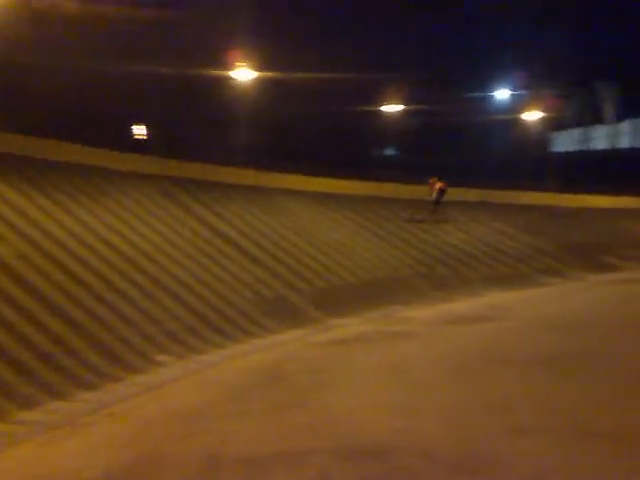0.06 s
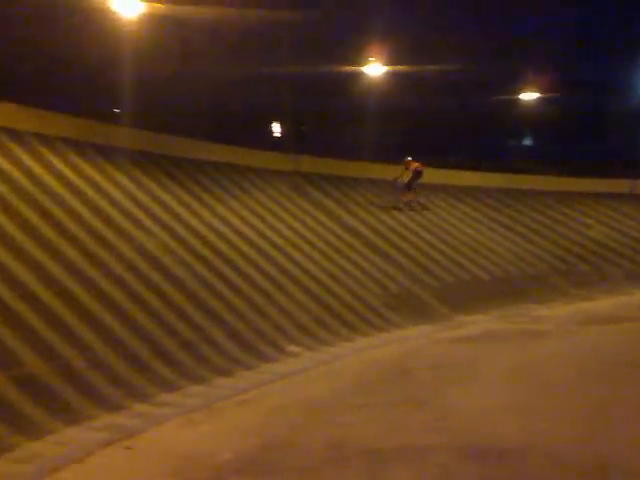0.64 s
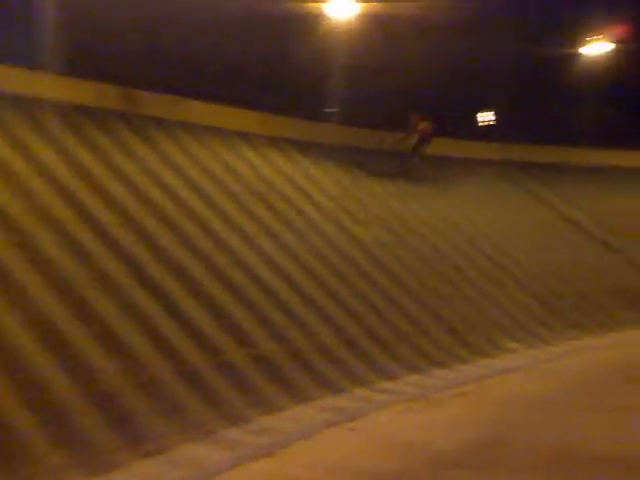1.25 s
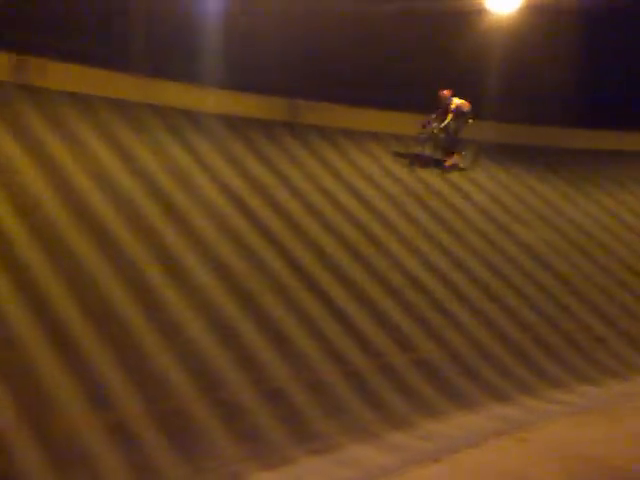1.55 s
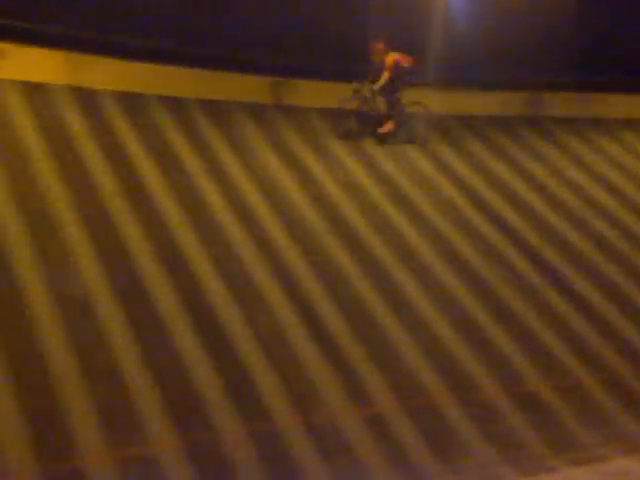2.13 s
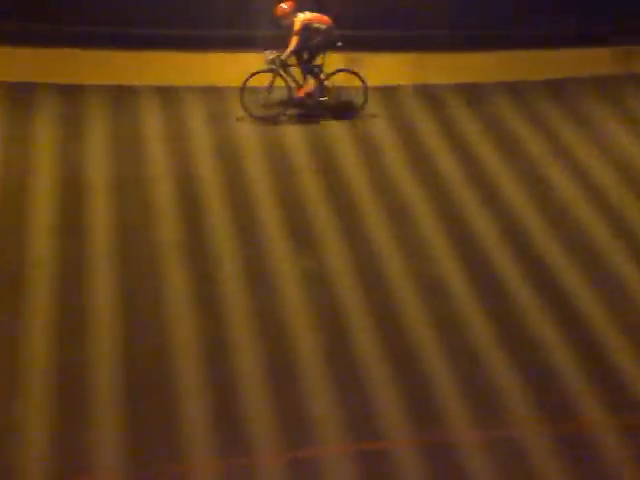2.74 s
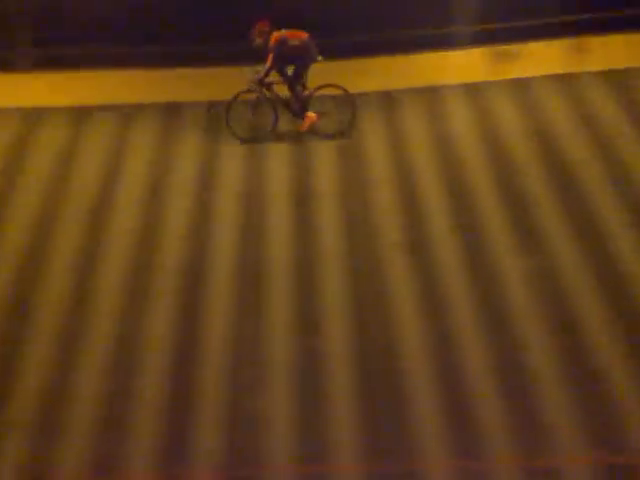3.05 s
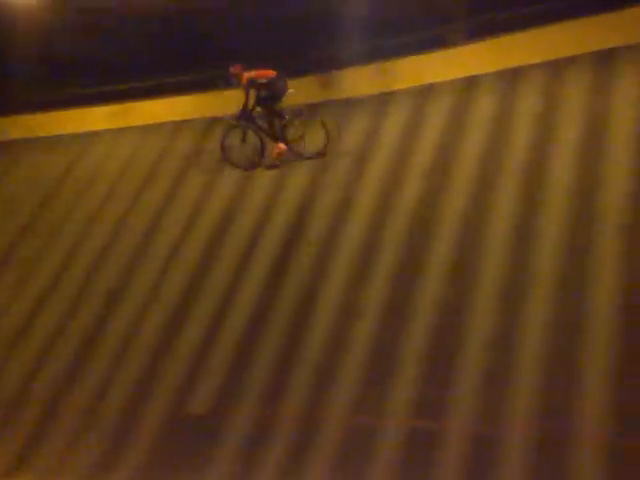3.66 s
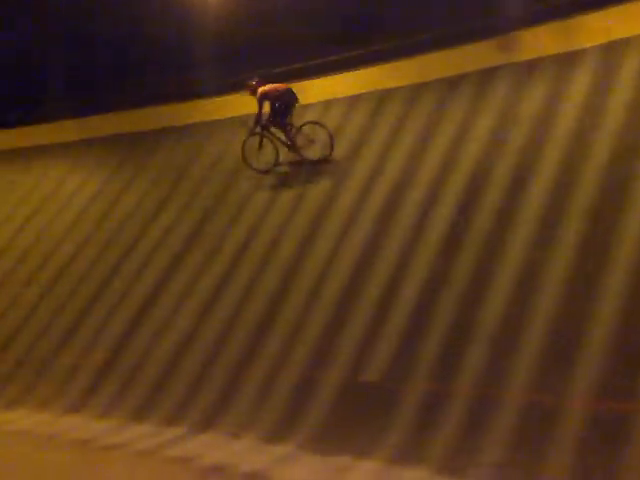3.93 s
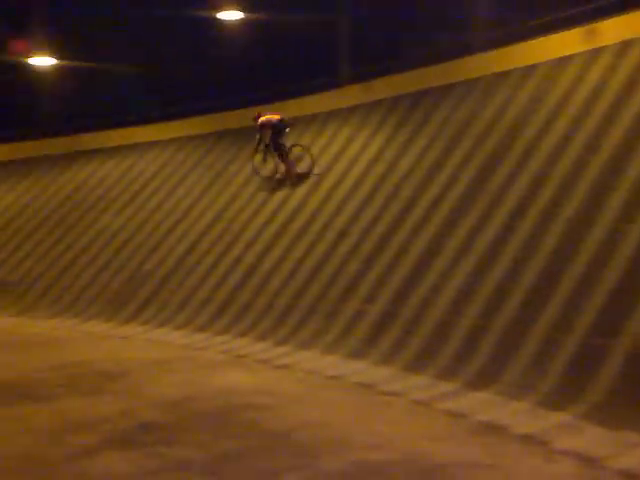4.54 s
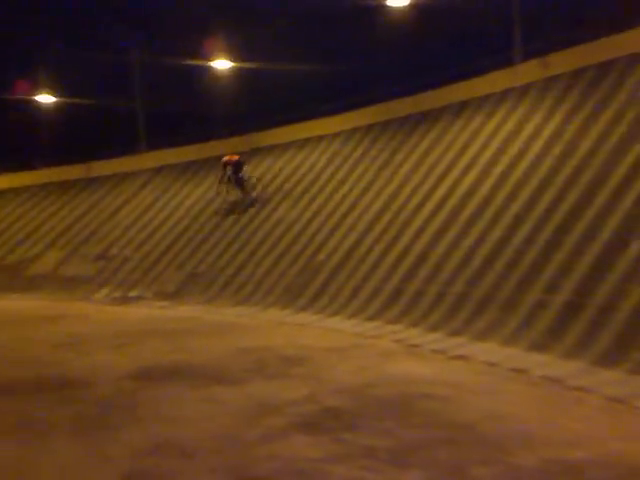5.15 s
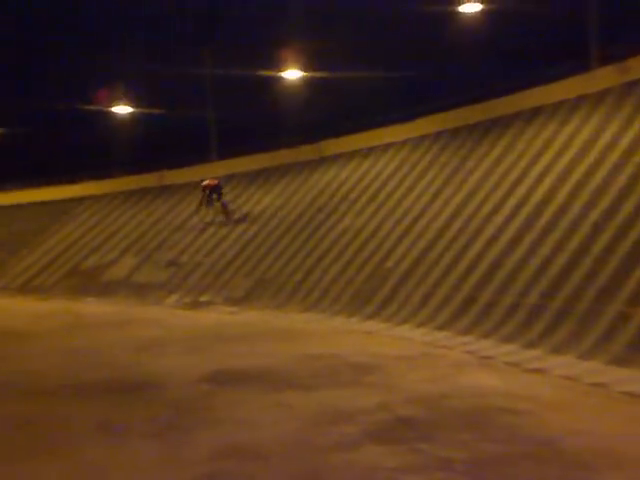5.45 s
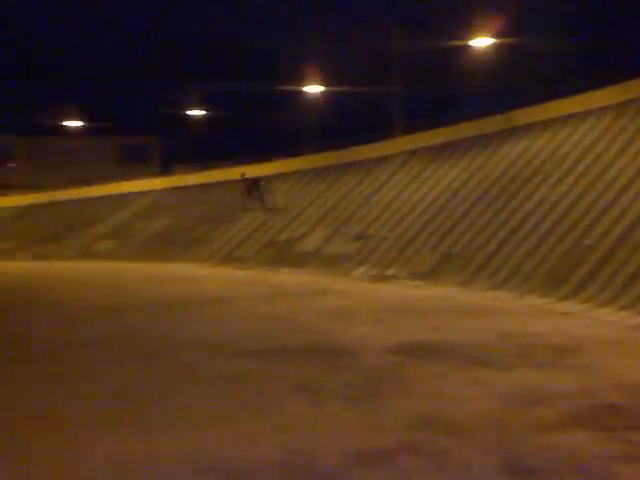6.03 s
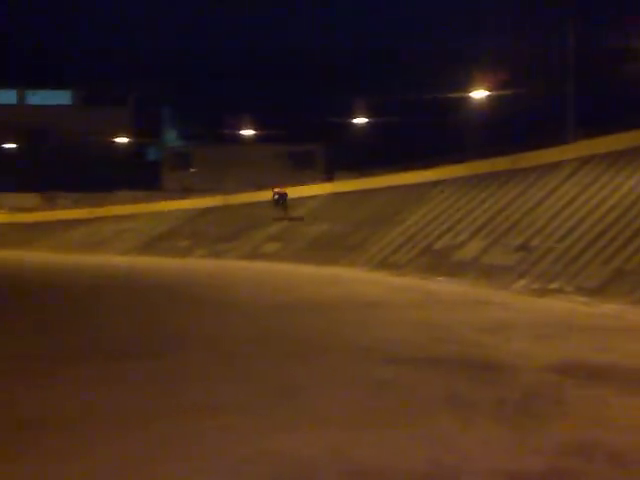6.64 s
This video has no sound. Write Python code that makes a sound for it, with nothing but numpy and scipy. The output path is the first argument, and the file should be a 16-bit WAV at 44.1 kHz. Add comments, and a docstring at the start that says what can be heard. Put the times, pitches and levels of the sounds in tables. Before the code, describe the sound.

Heard from the middle of an open concrete cycle track, distant bicycle tyres hiss softly and tick over grit, shifting in tone as the rider goes by. A low, faint rumble of night air lies underneath. Late on, something strikes the camera case right at the microphone with a loud, sharp knock. A few soft handling bumps follow while the tyre noise fades.

```python
"""Bicycle tyres hiss and crackle over grit and rough stretches, lapping a banked concrete track at night.
Narrow bands stand out in the hiss; a reflection off the banking shifts its colour as the bicycle passes.
Late on, something knocks sharply on the case of a hand-held camera in the infield, among softer
handling bumps. The night air rumbles underneath."""
import sys
import numpy as np
from scipy import signal
from scipy.fft import rfft, irfft
from scipy.io import wavfile
from scipy.ndimage import uniform_filter1d

SR = 44100
rng = np.random.default_rng(int(sys.argv[2]) if len(sys.argv) > 2 else 0)


def put_to_file(sound):
    """Save the sound as 16-bit audio at rate SR, in the file named by the first command-line argument."""
    columns = np.atleast_2d(sound).T  # one column per channel
    safe = np.clip(columns, -1, 1)
    whole_steps = np.round(safe * 32767)
    wavfile.write(sys.argv[1], SR, whole_steps.astype(np.int16))


N = 299439
TIME_S = np.arange(N) / SR
FRAMES = dict(fs=SR, nperseg=1024, noverlap=768)

# blows on the case: (time [s], relative force [dB], contact cutoff [Hz])
BLOWS = [ (6.0123, -2, 7000), (6.0133, 0, 2100), (6.0144, 8, 1150), (6.0771, -33.5, 7400),
         (6.1874, -1.5, 493)]


def tyres(grit_db=-3):
    """Hiss and grit swell and fade together; more grit where the hiss is bright."""
    level_db, treble_db = surface(TIME_S)
    return gain_of(level_db) * (hiss() + gain_of(grit_db + treble_db) * grit())


def surface(t, edge_s=0.041):
    """Level and treble of the tyre noise [dB]: a slow course, offset on each rough stretch."""
    # ordinary concrete: (time [s], relative level [dB], treble re mid band [dB])
    lap = [(0, -55.5, -9.5), (0.3, -56.5, -9.5), (0.9, -53, -6.5), (1.8, -52.5, -8.5), (2.2, -51.5, -8.5),
           (2.65, -49.5, -11.5), (3.2, -50.5, -14), (4.3, -51.5, -11.5), (5.3, -52.5, -11),
           (5.75, -52, -15.5), (6.22, -52.5, -13.5), (6.44, -63, -10), (6.79, -63, -9.5)]
    # rough stretches: (start [s], length [s], level change [dB], treble change [dB])
    stretches = [(0.313, 0.2, 4, -4.5), (0.62, 0.15, 4.5, 0.5), (1.065, 0.19, 5, -3.5),
                 (1.292, 0.085, 2, 1.5), (2.063, 0.15, 1.5, -1), (2.443, 0.11, 6, -5),
                 (3.24, 0.3, 2.5, 0.5), (3.86, 0.24, 2.5, 1.5), (5.315, 0.047, 4.5, 1),
                 (5.912, 0.27, 1.5, 5)]
    level_db, treble_db = follow(lap, t)
    for start_s, length_s, louder_db, brighter_db in stretches:
        on = np.clip(0.5 + np.minimum(t - start_s, start_s + length_s - t) / edge_s, 0, 1)
        level_db += on * louder_db
        treble_db += on * brighter_db
    return level_db, treble_db


def hiss(flutter_db=2.5, flutter_hz=50, patch_db=2.2):
    """Rubber on rough concrete: fluttering noise whose colour changes from patch to patch."""
    # tyre spectrum: (frequency [Hz], relative density [dB])
    spectrum = [(130, -57), (200, -14), (300, -6.5), (450, -13.5), (680, -4.5), (1200, -0.5), (1900, 0),
                (2400, -4), (2900, -9), (4000, -14.5), (5000, -20.5), (6500, -35), (9000, -44.5),
                (14000, -65.5)]
    contact = rng.standard_normal(N) * gain_of(flutter_db * drift(flutter_hz))
    hz, t, z = signal.stft(contact, **FRAMES)
    patches = uniform_filter1d(rng.standard_normal(z.shape), size=5, axis=0)
    patches = evened(uniform_filter1d(patches, size=12, axis=1))
    z *= gain_of(spectrum_at(spectrum, hz)[:, None] + patch_db * patches)
    # the surface sets the treble-to-mid ratio
    power = (abs(z) ** 2).mean(1)
    mid = power[(hz > 600) & (hz < 2600)].sum()
    treble = power[(hz > 3000) & (hz < 6500)].sum()
    tilt_db = surface(t)[1] - 10 * np.log10(treble / mid)
    shelf = spectrum_at([(2000, 0), (3400, 1)], hz)[:, None]
    return evened(signal.istft(z * gain_of(shelf * tilt_db), **FRAMES)[1][:N])


def grit(grains_per_s=85, t60_s=0.018):
    """Small grains snap under the tyres, each a brief crackle."""
    # snap spectrum: (frequency [Hz], relative density [dB])
    spectrum = [(200, -26), (800, -11.5), (2000, -2.5), (3400, 6.5), (5000, -5), (7000, -17),
                (10000, -40), (16000, -45.5)]
    size = gain_of(3.5 * np.minimum(rng.exponential(1, N), 3))
    struck = rng.random(N) < grains_per_s / SR
    envelope = signal.lfilter([1], [1, -gain_of(-60 / (t60_s * SR))], size * struck)
    return evened(colour(envelope * rng.standard_normal(N), spectrum))


def scuffs():
    """The tyres tick and scuff on grit in broad bands."""
    # scuffs: (time [s], relative level [dB], centre [Hz], t60 [s])
    ticks = [(0.022, -45, 1680, 0.07), (0.129, -47.5, 1900, .05), (0.651, -46.5, 784, 0.065),
             (0.700, -46.5, 780, 0.055), (0.758, -41.5, 2500, 0.08), (1.017, -38.5, 3660, 0.014),
             (1.197, -41.5, 706, 0.056), (1.345, -49, 2920, .08), (2.105, -40.5, 2260, 0.057),
             (2.222, -40.5, 2150, 0.024), (2.367, -34.5, 1680, 0.023), (2.448, -37, 1650, 0.033),
             (2.501, -39, 1140, .05), (2.745, -40, 2110, 0.054), (3.158, -42, 1000, 0.035),
             (3.219, -46, 3580, 0.031), (3.429, -42, 2280, 0.027), (3.782, -40, 945, 0.042),
             (4.083, -45, 1900, .03), (4.513, -41, 2200, 0.18), (4.978, -42, 1860, 0.024),
             (5.076, -39.5, 1700, 0.15), (5.457, -37.5, 1660, 0.046), (5.495, -39.5, 2300, .045),
             (5.619, -43, 2070, .034), (6.140, -45.5, 3370, 0.099), (6.299, -47.5, 1940, 0.13)]
    return bursts(ticks, rise_s=0.00073, half_width_oct=0.54)


def hiss_peak(x, width_hz=175, peak_db=4):
    """A narrow band near 2 kHz stands out in the tyre hiss, dipping in pitch as the bicycle passes."""
    # peak course: (time [s], centre [Hz])
    course = [(0, 1900), (1.1, 1950), (1.7, 1790), (4.3, 1790), (5.2, 2064), (6.79, 2050)]
    hz, t, z = signal.stft(x, **FRAMES)
    boost_db = peak_db * bell(hz[:, None], follow(course, t)[0], width_hz)
    return signal.istft(z * gain_of(boost_db), **FRAMES)[1][:N]


def pings():
    """Brief narrow pings and longer whistling bands in the tyre noise."""
    # pings and whistles: (time [s], relative level [dB], centre [Hz], t60 [s])
    bands = [(0.335, -47.5, 1390, 0.3), (0.68, -51.5, 3400, 0.46), (1.017, -36.5, 4100, 0.019),
             (1.098, -45, 1400, 0.083), (3.27, -52, 1250, 0.47), (3.385, -41.5, 1210, 0.084),
             (3.46, -46.5, 1820, 0.36), (3.91, -62, 4770, 0.87), (4.52, -44, 2300, 0.2),
             (6.49, -61.5, 2670, 1)]
    return bursts(bands, rise_s=0.0014, half_width_oct=0.075)


def banking(hz, t, pass_s=3, half_width_s=1.94):
    """Comb response of the banking: as the bicycle nears, the reflection lags more and weakens."""
    nearness = np.exp(-((t - pass_s) / half_width_s) ** 4)
    spacing_hz = np.interp(nearness, [0, 1], [681, 584])
    reflection = np.interp(nearness, [0, 1], [0.24, 0.12])
    return 1 / (1 - reflection * np.exp(-2j * np.pi * hz[:, None] / spacing_hz))


def track_to_microphone(x):
    """Sound arrives directly and off the banking, then passes the microphone's port."""
    # port resonances: (centre [Hz], width [Hz], gain [dB])
    port = [(1150, 143, 1.5), (1410, 290, -1), (1810, 300, 1), (2250, 170, 2), (3630, 190, 2.5),
            (4320, 370, -1.5), (4770, 347, 4.5), (6250, 300, 3)]
    hz, t, z = signal.stft(x, **FRAMES)
    port_db = sum(db * bell(hz, centre_hz, width_hz) for centre_hz, width_hz, db in port)
    return signal.istft(z * banking(hz, t) * gain_of(port_db)[:, None], **FRAMES)[1][:N]


def knocks():
    """Blows ring the case; soft contacts reach only low modes; the small shell radiates no deep bass."""
    # case modes: (frequency [Hz], relative level [dB], t60 [s])
    modes = [ (278, -21.5, .031), (510, -29, .02), (882, -11.5, .019), (1342, -15.5, .014),
             (1700, -40, 0.0121), (2060, -11.5, 0.026), (2990, -21, 0.011), (3410, -1, 0.0062),
             (4210, -16.5, 0.019), (5320, -5, 0.0048), (7000, -22.5, 0.014), (8950, -26.5, 0.0085),
             (11550, -27, .006), (14300, -40.5, 0.0046)]
    out, t = np.zeros(N), np.arange(4096) / SR
    ring = sum(gain_of(db - 60 * t / t60_s) * np.sin(2 * np.pi * hz * t) for hz, db, t60_s in modes)
    for start_s, force_db, cutoff_hz in BLOWS:
        contact = signal.butter(4, cutoff_hz, fs=SR)
        add(out, start_s, gain_of(force_db) * signal.lfilter(*contact, ring))
    return signal.lfilter(*signal.butter(2, 245, "high", fs=SR), out)


def scatter(x, t60_s):
    """Hard concrete scatters a knock back as a thin, bright tail."""
    # tail spectrum: (frequency [Hz], relative density [dB])
    spectrum = [(200, 12.5), (850, -2.5), (2000, 5), (5000, 1.5), (9000, 0.5), (15000, 9)]
    t = np.arange(SR // 2) / SR
    tail = colour(rng.standard_normal(len(t)), spectrum) * gain_of(-60 * t / t60_s)
    return signal.fftconvolve(x, tail / np.linalg.norm(tail))[:N]


def sizzle(level_db=-54, t60_s=0.09):
    """A faint bright tail follows the first blow."""
    # sizzle spectrum: (frequency [Hz], relative density [dB])
    spectrum = [(2000, -20.5), (6000, 1), (10000, -5.5), (16000, -4)]
    out, t = np.zeros(N), np.arange(SR // 2) / SR
    noise = evened(colour(rng.standard_normal(len(t)), spectrum))
    add(out, BLOWS[0][0], gain_of(level_db - 60 * t / t60_s) * noise)
    return out


def handling():
    """Fingers shift on the camera in low, soft bumps."""
    # finger rubs: (time [s], level [dB], centre [Hz], t60 [s])
    rubs = [(2.664, -51, 333, 0.049), (3.156, -41.5, 427, 0.04), (3.783, -47.5, 600, 0.033),
            (5.812, -43.5, 477, 0.053), (5.890, -43, 259, 0.072), (6.258, -47, 274, 0.096),
            (6.386, -41.5, 377, 0.04), (6.562, -56, 380, 0.096)]
    return bursts(rubs, rise_s=0.00086, half_width_oct=0.61)


def night(flutter_db=2, flutter_hz=9, floor_db=-60.5):
    """Fluttering rumble of the night air over a faint, even hiss."""
    # air rumble: (frequency [Hz], relative density [dB])
    rumble_spectrum = [(15, 2), (45, -4.5), (70, 4), (110, -11), (170, -13.5), (400, -30), (2000, -62)]
    # rumble course: (time [s], level [dB])
    rumble_level = [(0, -62.5), (1.9, -64.5), (2.5, -61.5), (3.4, -62), (4.2, -66.5), (4.7, -63),
                    (5.4, -69.5), (5.9, -62.5), (6.79, -64)]
    # far surroundings and microphone hiss: (frequency [Hz], relative density [dB])
    floor_spectrum = [(60, -27.5), (170, -16), (290, -9.5), (500, -16), (1200, -10.5), (1750, -10),
                      (2030, -3.5), (2350, -16.5), (2660, -13), (3000, -20), (5000, -26), (7500, -30.5),
                      (16000, -30.5)]
    rumble = colour(rng.standard_normal(N), rumble_spectrum)
    rumble = evened(rumble * gain_of(flutter_db * drift(flutter_hz)))
    floor = evened(colour(rng.standard_normal(N), floor_spectrum))
    return gain_of(follow(rumble_level, TIME_S)[0]) * rumble + gain_of(floor_db) * floor


def bursts(events, rise_s, half_width_oct):
    """Decaying noise bursts, each in its own band."""
    size = 16384
    out, t, hz = np.zeros(N), np.arange(size) / SR, np.fft.rfftfreq(size, 1 / SR)
    shelf = gain_of(spectrum_at([(4600, -9), (8000, -12)], hz))
    for start_s, db, centre_hz, t60_s in events:
        band = 1 / (1 + (np.log2((hz + 1) / centre_hz) / half_width_oct) ** 4)
        envelope = (1 - np.exp(-t / rise_s)) * gain_of(-60 * t / t60_s)
        burst = envelope * irfft(rfft(rng.standard_normal(size)) * band * shelf)
        crest = envelope.max() / np.sqrt(np.mean(envelope ** 2))
        add(out, start_s, gain_of(db) * evened(burst) / crest)
    return out


def gain_of(db):
    """Decibels to amplitude."""
    return 10 ** (np.asarray(db) / 20)


def evened(x):
    """Scales to rms 1."""
    return x / np.sqrt(np.mean(x ** 2) + 1e-20)


def bell(hz, centre_hz, width_hz):
    """Resonance curve of height 1."""
    return 1 / (1 + (2 * (hz - centre_hz) / width_hz) ** 2)


def spectrum_at(points, hz):
    """Interpolates on a log-frequency axis."""
    point_hz, value = np.transpose(points)
    return np.interp(np.log(hz + 1), np.log(point_hz + 1), value)


def colour(x, spectrum):
    """Filters x by a spectrum in dB."""
    hz = np.fft.rfftfreq(len(x), 1 / SR)
    return irfft(rfft(x) * gain_of(spectrum_at(spectrum, hz)), len(x))


def drift(rate_hz):
    """Random wander of rms 1, up to about rate_hz."""
    hz = np.fft.rfftfreq(N, 1 / SR)
    return evened(irfft(rfft(rng.standard_normal(N)) * np.exp(-(hz / rate_hz) ** 2), N))


def follow(curve, t):
    """Columns of a curve at times t."""
    point_s, *columns = np.transpose(curve)
    return [np.interp(t, point_s, column) for column in columns]


def add(mix, start_s, sound):
    """Mixes a sound in at start_s."""
    part = mix[round(start_s * SR):][:len(sound)]
    part += sound[:len(part)]


def scene():
    """The bicycle far off; knocks and fingers right at the microphone."""
    accents = gain_of(-3.5) * (scuffs() + pings())
    rolling = gain_of(-2) * hiss_peak(tyres())
    bicycle = track_to_microphone(rolling + accents)
    case = knocks()
    ground = gain_of(-21.5) * scatter(case, t60_s=0.072)
    bowl = gain_of(-26.5) * scatter(case, t60_s=0.58)
    return (bicycle + case + ground + bowl + handling() + night() + sizzle())[None]


def record(dry):
    """The loudest knock just overloads the input; a low-pass follows."""
    ceiling, cutoff_hz = 0.71, 15850
    low_pass = signal.firwin(511, cutoff_hz, window=("kaiser", 9), fs=SR)
    return signal.oaconvolve(np.clip(dry, -ceiling, ceiling), low_pass[None], "same")


dry = scene()
out = record(dry)
put_to_file(out)
```